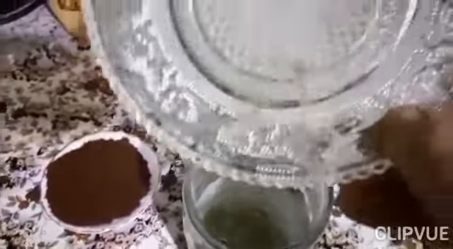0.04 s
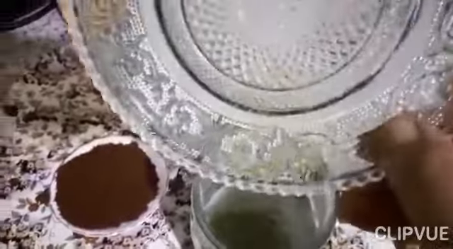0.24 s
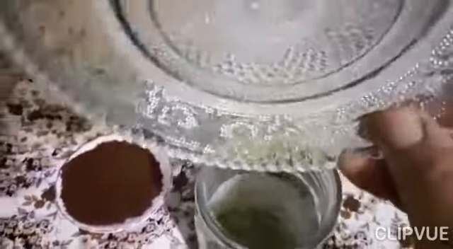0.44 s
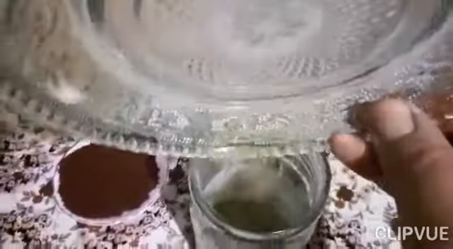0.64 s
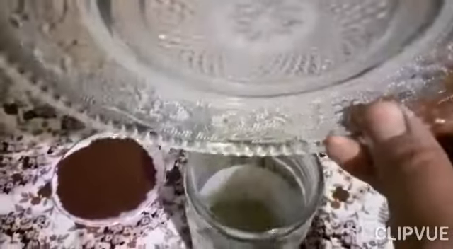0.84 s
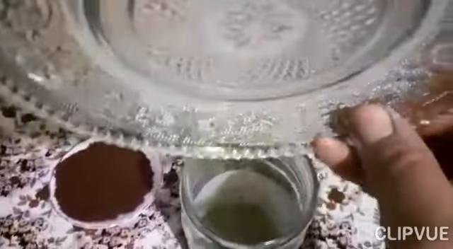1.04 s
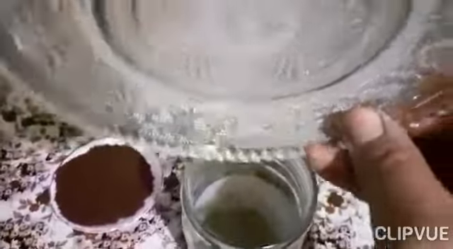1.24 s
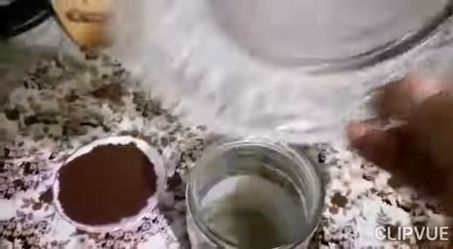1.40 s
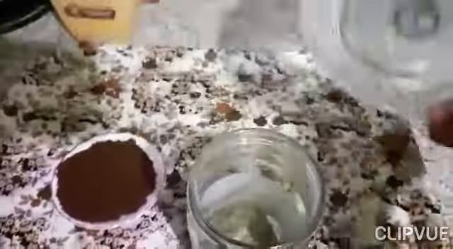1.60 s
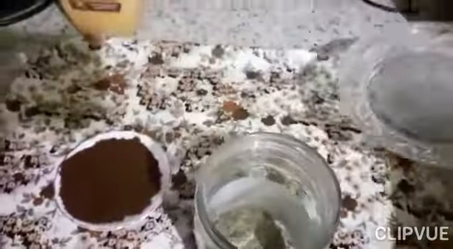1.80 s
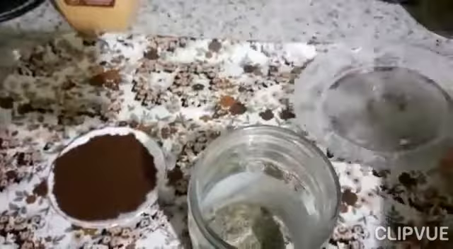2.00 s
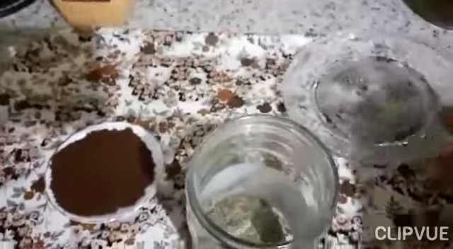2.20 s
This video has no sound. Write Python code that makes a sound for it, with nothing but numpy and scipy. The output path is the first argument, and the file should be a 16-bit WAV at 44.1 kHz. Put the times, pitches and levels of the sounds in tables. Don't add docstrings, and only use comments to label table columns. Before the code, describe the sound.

A cut-glass plate is tapped on a glass jar's rim in uneven bright clinks with small rattling bounces, lifted away ringing briefly, then laid with a dull knock on a covered counter; close phone microphone, quiet kitchen.

```python
import sys
import numpy as np
from scipy import signal
from scipy.fft import rfft, irfft, next_fast_len
from scipy.io import wavfile

SR = 44100
rng = np.random.default_rng(int(sys.argv[2]) if len(sys.argv) > 2 else 0)


def int16_out(signal):
    q = np.round(np.clip(np.atleast_2d(signal).T, -1, 1) * 32767)
    wavfile.write(sys.argv[1], SR, q.astype(np.int16))


def amplitude_ratio(level_db):
    exponent = np.asarray(level_db, float) / 20
    return 10 ** exponent


N = 99269
T = np.arange(N) / SR


def at_hz(points, hz):
    table_hz, values = np.transpose(points)
    return np.interp(np.log(hz), np.log(table_hz), values)


def sides(db):
    return amplitude_ratio(np.array([[db / 2], [-db / 2]]))


def band_pass(low_hz, high_hz, x):
    return signal.sosfilt(signal.butter(2, [low_hz, high_hz], "band", fs=SR, output="sos"), x)


def waver():
    flutter_hz = 38.3
    r = np.exp(-2 * np.pi * flutter_hz / SR)
    slow = signal.lfilter([1], [1, -2 * r, r * r], rng.standard_normal(2 * SR))
    return slow / slow.std()


LIFTED_S, FLUTTER_GROWS_S, SCATTER_DB = 1.3, .03, 1
TWIN_DB, TWIN_SPLIT, TWIN_DECAY = 8.5, 0.0069, 0.15


def strike(pitches_hz, modes, times_s, levels_db, rise_s, flutter_db, free_ring):
    out = np.zeros((2, N))
    chance = rng.standard_normal((len(times_s), 4, len(modes)))
    slow = waver()
    for start_s, contact_db, draws in zip(times_s, levels_db, chance):
        start = int(start_s * SR)
        for hz, (mode_db, t60_s, pan_db, lead_rad), (a, p, q, split) in zip(pitches_hz, modes, draws.T):
            lasts_s = t60_s * (free_ring if start_s > LIFTED_S else 1)
            t = T[:N - start][:int(1.05 * lasts_s * SR)]
            loss_db = 60 * t / lasts_s
            phase = 2 * np.pi * hz * t + 1.017 * p + np.array([[lead_rad], [0]])
            twin_phase = phase + 2 * q + 2 * np.pi * TWIN_SPLIT * hz * split * t
            pair = amplitude_ratio(-loss_db) * np.sin(phase)
            pair = pair + amplitude_ratio(TWIN_DB - loss_db / TWIN_DECAY) * np.sin(twin_phase)
            wobble_db = flutter_db * slow[rng.integers(SR):][:len(t)] * (1 - np.exp(-t / FLUTTER_GROWS_S))
            scatter_db = SCATTER_DB * a * (0.05 + hz / 9000)
            level = amplitude_ratio(contact_db + mode_db + scatter_db + wobble_db) * (1 - np.exp(-t / rise_s))
            out[:, start:start + len(t)] += sides(pan_db) * level * pair
    return out


def bands(spectrum, pan, likeness, envelope):
    out, power = 0, 0
    edges_hz = 30 * 2 ** np.arange(0, 9.2, 1 / 3)
    white = rng.standard_normal((2, 2, N))
    for k, (low, high) in enumerate(zip(edges_hz, edges_hz[1:])):
        mid, side = band_pass(low, high, white[k % 2])
        hz = np.sqrt(low * high)
        alike = np.clip(at_hz(likeness, hz), -.99, .99)
        gain = amplitude_ratio(at_hz(spectrum, hz))
        pair = np.sqrt(1 + alike) * mid + np.sqrt(1 - alike) * side * [[1], [-1]]
        out = out + gain * envelope(hz) * sides(at_hz(pan, hz)) * pair
        power += gain ** 2 * 4 * (high - low) / SR
    return out / np.sqrt(power)


def bursts(times_s, levels_db, t60s):
    kicks = np.zeros(N)
    kicks[(np.array(times_s) * SR).astype(int)] = amplitude_ratio(np.array(levels_db))

    def envelope(hz):
        fall = amplitude_ratio(-60 / at_hz(t60s, hz) / SR)
        rise = np.exp(-hz / (1.5 * SR))
        return signal.lfilter([1 - rise], np.convolve([1, -fall], [1, -rise]), kicks + 1e-18)
    return envelope


# hz, level_db_per_hz
HUSH = [(30, -32), (80, -2.5), (400, -1.5), (850, -11), (1700, -16), (2900, -31.5), (5500, -12),
        (15000, -32.5)]
# time_s, level_db
HUSH_LEVEL = [(0, -59.5), (.16, -59.5), (.6, -59), (1.2, -53), (1.6, -62), (1.85, -67.5), (2.05, -63),
              (2.25, -61.5)]
# hz, correlation
HUSH_LIKENESS = [(60, 1), (240, -0.76), (950, 0.47), (3770, 0.023), (15000, 0.52)]
# hz, pan_db
HUSH_PAN = [(60, -3.5), (180, -1.5), (550, -1.5), (1650, -8), (4970, -9), (15000, 20.5)]


def hush():
    return amplitude_ratio(np.interp(T, *np.transpose(HUSH_LEVEL))) * bands(HUSH, HUSH_PAN, HUSH_LIKENESS, lambda hz: 1)


RING_RISE_S, BODY_RISE_S, RIM_RISE_S = 0.0013, 0.0011, .003
SOFT_DULLS = .3
BRIGHT_HZ = [4915, 4945, 5028, 5915, 6837, 7350, 7665, 8900, 9912, 10440]
# level_db, t60_s, pan_db, left_lead_rad
BRIGHT = [(-7, 0.11, -5, 2.17), (-6.5, 0.11, -6, -0.85), (1, 0.059, -4.5, 1.08), (-12, 0.062, -19.5, 9.5),
          (-32, .12, -7.5, 5), (-8.5, 0.038, -9.5, 4), (-10, 0.047, 1.5, -4.5), (-28, 0.083, 21, 8),
          (-35, 0.17, 15, 1), (-26.5, 0.061, 20.5, -2)]
TREBLE_HZ = [7080, 7520, 8720, 9080, 9760, 10180, 11800, 12234, 12950, 13200, 13330, 13480, 14040]
# level_db, t60_s, pan_db, left_lead_rad
TREBLE = [(-22.5, .07, -0.5, 1), (-19.5, 0.11, -0.5, 1.76), (-32, 0.087, 19.5, 0.91), (-33.5, .07, 14, 2.3),
          (-35, .08, 14.5, 1), (-34, .1, 15, 1), (-43, .15, 0, 2.2), (-30.5, 0.18, 0, 1.8),
          (-28, .14, 5, 1), (-23, .05, 5, 1.3), (-27.5, .12, 6, 0.49), (-26, .1, -2.5, 2),
          (-23, 0.12, 4, 2.9)]


def bright_rings(times_s, levels_db):
    treble_db = levels_db + SOFT_DULLS * np.minimum(levels_db + 22.5, 0)
    rings = strike(BRIGHT_HZ, BRIGHT, times_s, levels_db, RING_RISE_S, flutter_db=3, free_ring=1.7)
    return rings + strike(TREBLE_HZ, TREBLE, times_s, treble_db, RING_RISE_S, flutter_db=4, free_ring=1.1)


BODY_HZ = [296, 480, 601, 625, 750, 1268, 1380, 1895, 2005, 565, 700, 785]
# level_db, t60_s, pan_db, left_lead_rad
BODY = [(-14, 0.11, 1.5, 0.58), (-13.5, 0.084, -1, 0.24), (-9, 0.25, -1, 1.1), (-5, .15, -1.5, 1.1),
        (-6, 0.128, 3.5, 0.26), (-8, 0.075, 7, 0.85), (-10, .1, 1, .5), (-3.5, 0.046, 2, .7),
        (-11, 0.085, -6.5, 2.14), (-9, 0.11, 0.5, 0.501), (-13.5, 0.081, 1.5, .5), (-15, 0.13, 3, 0.55)]


def plate_body(times_s, levels_db):
    return strike(BODY_HZ, BODY, times_s, levels_db, BODY_RISE_S, flutter_db=5, free_ring=1.35)


# start_s, pitch_hz, level_db, t60_s
SPLASH = [(.170, 5200, -12, .035), (.170, 5400, -20, .03), (.172, 6020, -28, .05), (.819, 5450, -26, .05),
          (.822, 2940, -17, .05), (1.144, 5550, -25, .03), (1.328, 5520, -24, .03), (.962, 2950, -31, .04),
          (.214, 1380, -38, .04), (.348, 1400, -50, .05), (.431, 1370, -43, .06), (.466, 1370, -43, .05),
          (.431, 3230, -54, .05), (.431, 6000, -56, .05), (.467, 6000, -54, .05), (.431, 7500, -58, .05),
          (.467, 7500, -58, .05), (.467, 9950, -62, .08), (.431, 700, -46, .06), (.170, 1330, -28, .04),
          (.170, 1650, -31, .04), (.977, 5000, -24, .04)]


def rim_splashes():
    out = 0
    for start_s, hz, db, t60_s in SPLASH:
        mode = (0.0016, t60_s, -6.5, 0.57)
        out = out + strike([hz], [mode], [start_s], [db], RING_RISE_S, flutter_db=-4, free_ring=1)
    return out


LOW_RIM_HZ = [2905, 2970]
# level_db, t60_s, pan_db, left_lead_rad
LOW_RIM = [(0, .28, 6, 1.05), (-9, .08, 4, .9)]
HIGH_RIM_HZ = [3209, 3222]
# level_db, t60_s, pan_db, left_lead_rad
HIGH_RIM = [(-3, .12, .6, 2.15), (-23, .33, .6, 2.15)]


def rim_tones(s, low_db, high_db):
    held = s < LIFTED_S
    low = strike(LOW_RIM_HZ, LOW_RIM, s[held], low_db[held], RIM_RISE_S, flutter_db=3.5, free_ring=1)
    low += strike(LOW_RIM_HZ, LOW_RIM, s[~held], low_db[~held], RIM_RISE_S, flutter_db=.4, free_ring=1.7)
    return low + strike(HIGH_RIM_HZ, HIGH_RIM, s, high_db, RIM_RISE_S, flutter_db=3, free_ring=1.3)


CLATTER_DB = 2.5
# hz, level_db_per_hz
CLATTER = [(60, -20.5), (400, -2), (2200, -5.5), (3900, -12.5), (5200, -7.5), (7500, -11.5), (8300, -31),
           (11500, -49), (15500, -51.5)]
# hz, t60_s
CLATTER_T60_S = [(100, 0.11), (700, 0.045), (3000, 0.059), (12000, 0.037)]
# hz, pan_db
CLATTER_PAN = [(60, -3), (130, 0.5), (290, -3.5), (640, -6), (1410, 3.5), (3100, 10.5), (6820, 3.5),
               (15000, 11)]
# hz, correlation
KNOCK_LIKENESS = [(60, 0.64), (240, 1), (950, 0.057), (3770, 0.086), (15000, 0.08)]


def clatter(times_s, body_db):
    levels_db = body_db + CLATTER_DB + SOFT_DULLS * np.minimum(body_db + 30.5, 0)
    return bands(CLATTER, CLATTER_PAN, KNOCK_LIKENESS, bursts(times_s, levels_db, CLATTER_T60_S))


# start_s, bright_db, body_db, low_rim_db, high_rim_db
TAPS = [(.168, -25, -31.5, -46, -47), (.170, -14.5, -26, -32.5, -9), (.214, -34, -37.5, -40, -39),
        (.346, -52, -46, -70, -56), (.429, -45, -43, -58, -52), (.465, -42, -44, -56, -60),
        (.642, -16.5, -25, -28, -27), (.668, -32.5, -33, -32, -61.5), (.676, -34, -37, -31.5, -51),
        (.817, -10.5, -21, -22.5, -11), (.826, -17.5, -24, -32.5, -32), (.955, -21.5, -26, -33.5, -30),
        (.960, -36, -34.5, -36.5, -20.5), (.975, -28.5, -25.5, -43, -46), (1.143, -12.5, -20.5, -24, -18.5),
        (1.154, -17.5, -26.5, -35, -24.5), (1.327, -14, -21, -13.5, -9.5), (1.342, -22, -26.5, -19.5, -31)]


def taps():
    s, bright_db, body_db, low_db, high_db = np.transpose(TAPS)
    rings = bright_rings(s, bright_db) + plate_body(s, body_db)
    return rings + rim_splashes() + rim_tones(s, low_db, high_db) + clatter(s, body_db)


def kitchen(x):
    t60_s, wall_cut_hz = 0.45, 10900
    size = next_fast_len(N + SR)
    w = 2 * np.pi * np.arange(size // 2 + 1) / size
    dull = 1 / (1 + 1j * w * SR / (2 * np.pi * wall_cut_hz))
    lags = (rng.uniform(.009, .04, (2, 8, 1)) * SR).astype(int)
    loop = amplitude_ratio(-60 * lags / SR / t60_s) * dull * np.exp(-1j * w * lags)
    answer = (loop / (1 - loop) * (-1) ** np.arange(8)[:, None]).sum(axis=1)
    return irfft(rfft(x, size) * answer, size)[:, :N]


RUSTLE_DB = 1
# start_s, length_s, centre_hz, width_hz, level_db
RUSTLES = [
    (1.685, .04, 5800, 2500, -65),
    (1.64, .1, 1400, 800, -76),
    (1.96, .13, 3500, 120, -73),
    (1.68, .42, 750, 400, -66),
    (2.06, .04, 1600, 900, -72),
    (1.2, .14, 10500, 7000, -60),
    (.68, .14, 9500, 7000, -64),
    (.47, .17, 7500, 6000, -66),
    (.33, .03, 650, 300, -50),
    (.26, .25, 90, 80, -64),
]


def rustles():
    out = 0
    for start_s, length_s, hz, width_hz, db in RUSTLES:
        noise = band_pass(hz - width_hz / 2, hz + width_hz / 2, rng.standard_normal((2, N)))
        swell = np.sin(np.pi * np.clip((T - start_s) / length_s, 0, 1))
        out = out + amplitude_ratio(db + RUSTLE_DB) * noise / noise.std() * swell
    return out


# start_s, peak_db
LANDINGS = [
    (2.103, -8.5),
    (2.12, -17),
    (2.133, -28),
    (2.23, -35),
]
LAID_HZ = [291, 565, 620, 750, 980, 1136, 1420, 1670, 2100, 4050]
# level_db, t60_s, pan_db, left_lead_rad
LAID = [(-20, 0.13, -6, 0.17), (-22, 0.05, -4.5, 0.306), (-3.5, 0.21, -1.5, 0.52), (10.5, 0.065, 2, 0.04),
        (-31, 0.018, -9, 0.35), (-12.5, 0.069, 25, 0.5), (0, 0.12, 1.5, 2.1), (-29, 0.078, 53.5, 0.97),
        (-13.5, 0.075, 17, 1.6), (-20, 0.016, -41.5, .6)]
THUD_DB = -14
# hz, level_db_per_hz
THUD = [(60, -23.5), (430, -20), (770, -5.5), (1260, -17), (5000, -15.5), (9000, -39), (11500, -46),
        (14000, -78)]
# hz, t60_s
THUD_T60_S = [(100, 0.32), (700, 0.12), (3000, 0.041), (12000, 0.096)]


def landing():
    s, db = np.transpose(LANDINGS)
    ring = strike(LAID_HZ, LAID, s, db - 15, BODY_RISE_S, flutter_db=6, free_ring=0.72)
    return ring + bands(THUD, HUSH_PAN, KNOCK_LIKENESS, bursts(s, db + THUD_DB, THUD_T60_S))


def scene():
    room_db = -20.5
    glass = taps() + landing()
    return glass + amplitude_ratio(room_db) * kitchen(glass) + rustles() + hush()


def roll_off(x):
    return signal.sosfilt(signal.butter(12, 15630, fs=SR, output="sos"), x)


def record(dry):
    ceiling, top_hz = 2.2, 14300
    rounded = ceiling * np.tanh(dry / ceiling)
    mix = signal.sosfilt(signal.butter(6, top_hz, fs=SR, output="sos"), rounded)
    return roll_off(mix)


dry = scene()
out = record(dry)
int16_out(out)
```